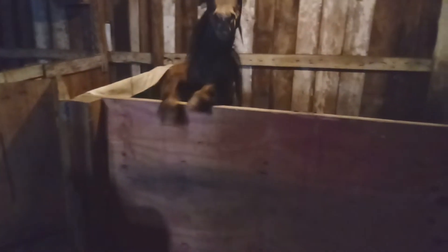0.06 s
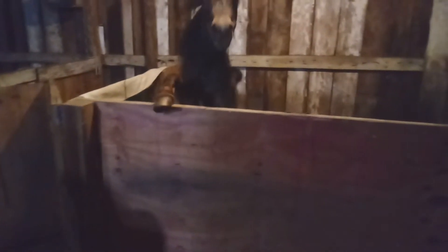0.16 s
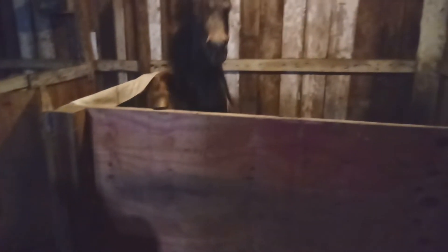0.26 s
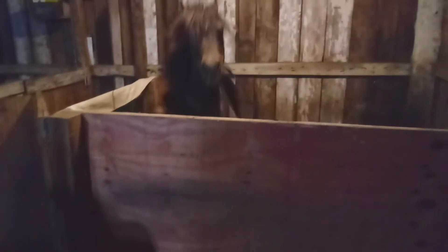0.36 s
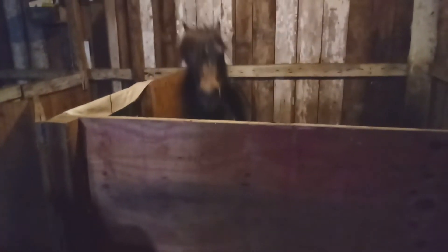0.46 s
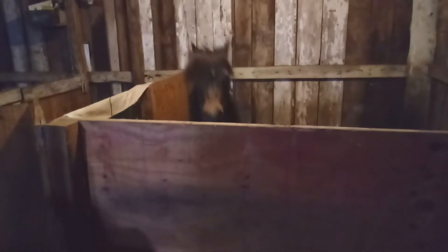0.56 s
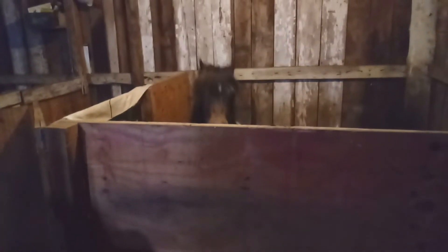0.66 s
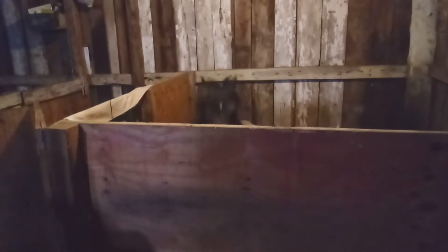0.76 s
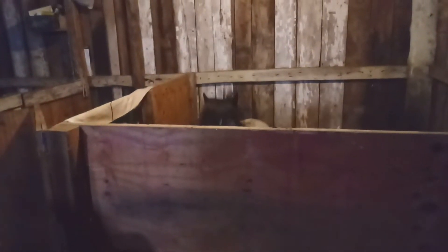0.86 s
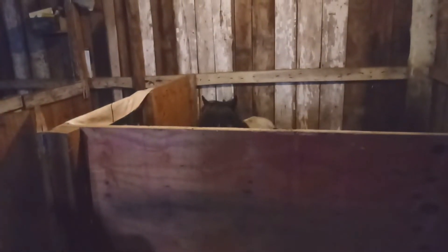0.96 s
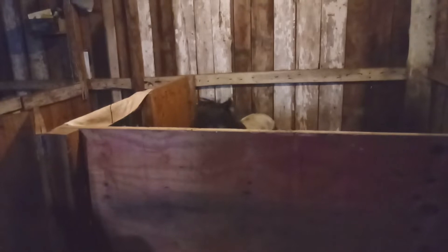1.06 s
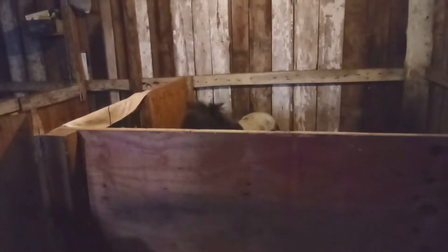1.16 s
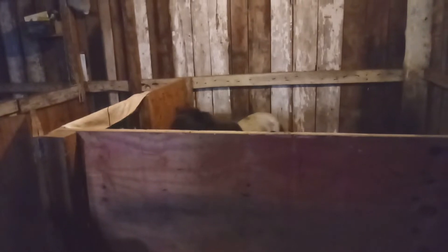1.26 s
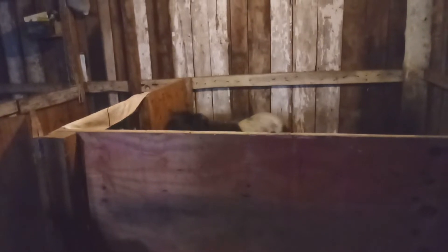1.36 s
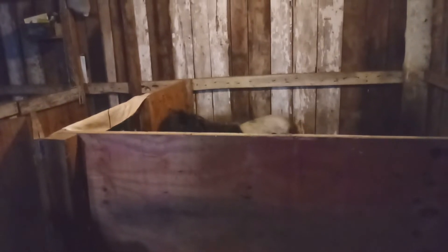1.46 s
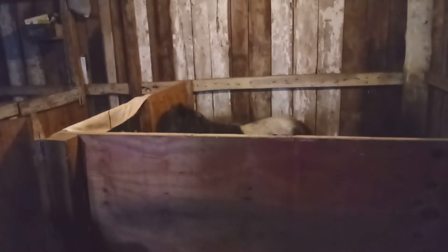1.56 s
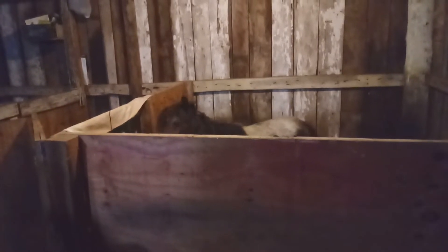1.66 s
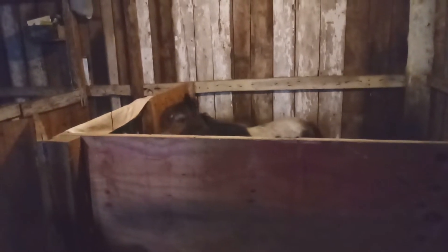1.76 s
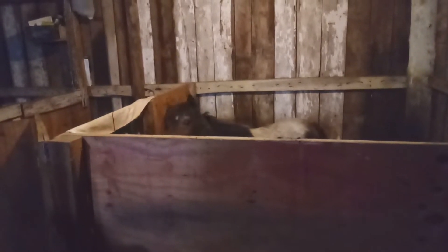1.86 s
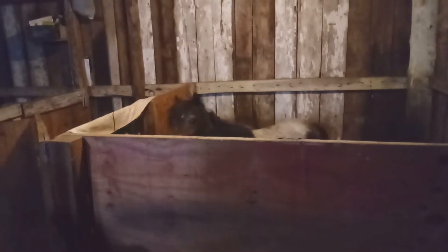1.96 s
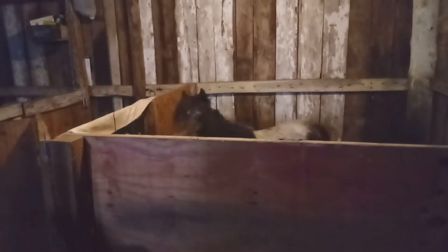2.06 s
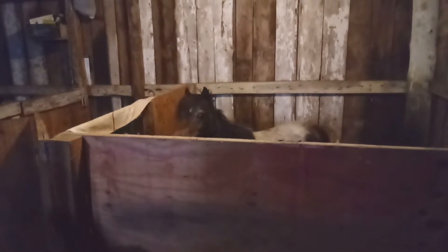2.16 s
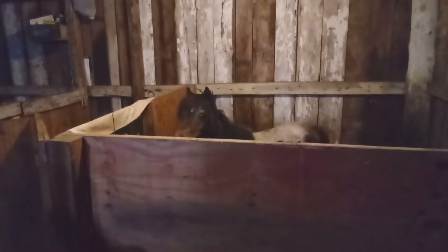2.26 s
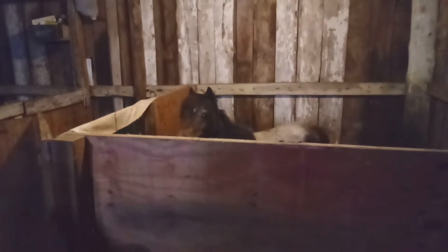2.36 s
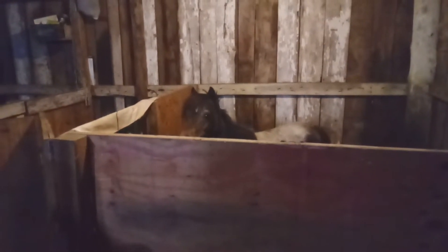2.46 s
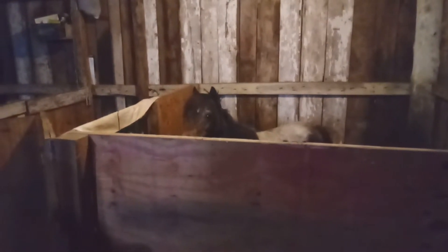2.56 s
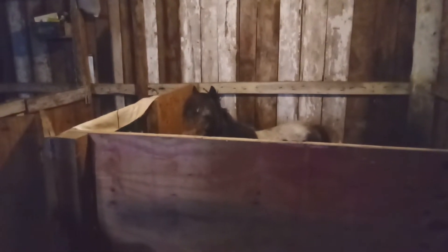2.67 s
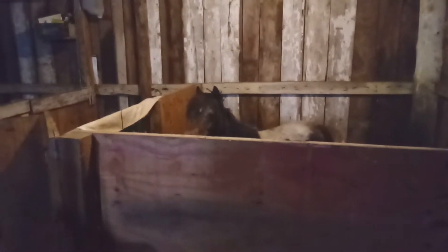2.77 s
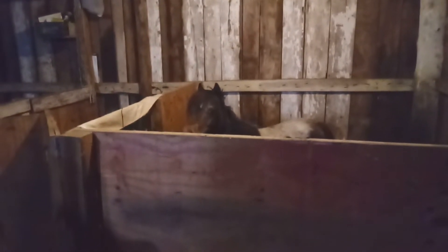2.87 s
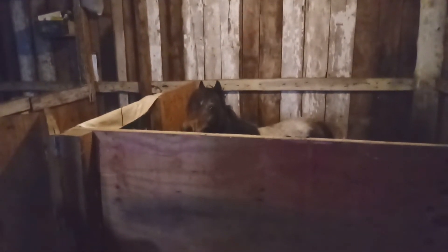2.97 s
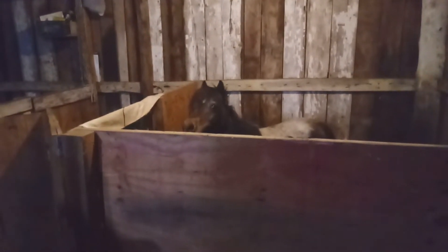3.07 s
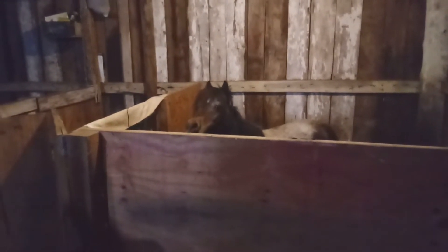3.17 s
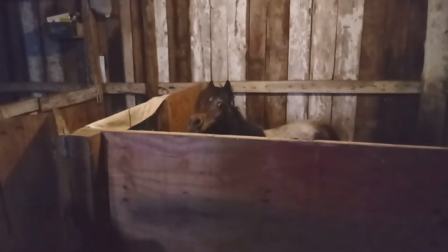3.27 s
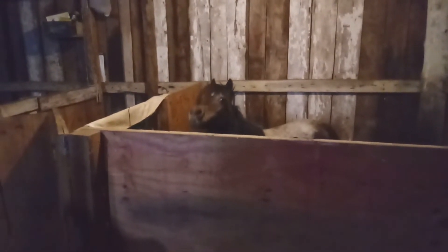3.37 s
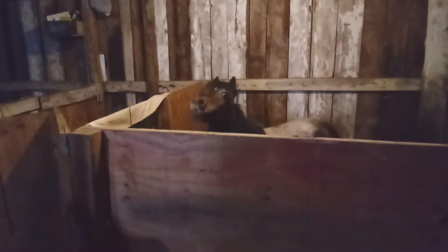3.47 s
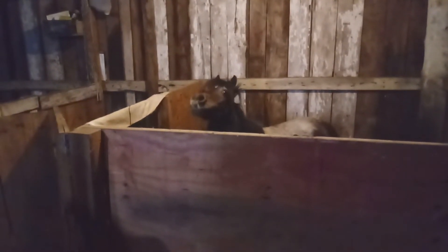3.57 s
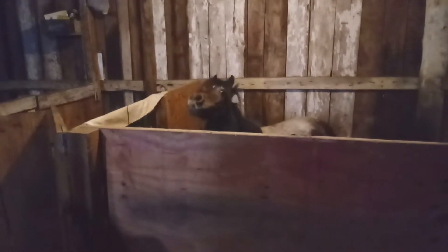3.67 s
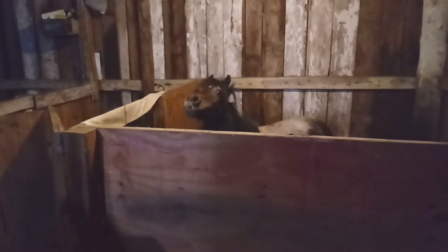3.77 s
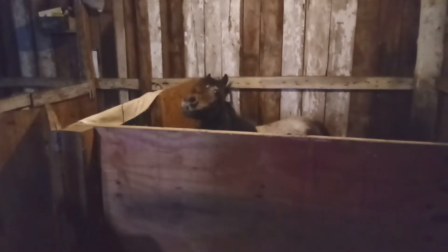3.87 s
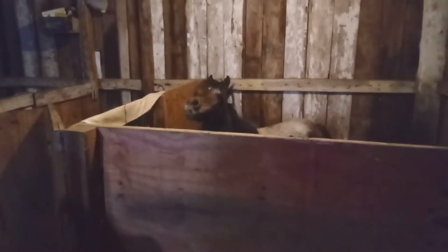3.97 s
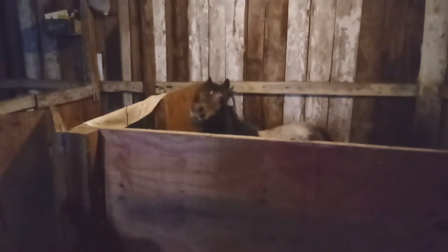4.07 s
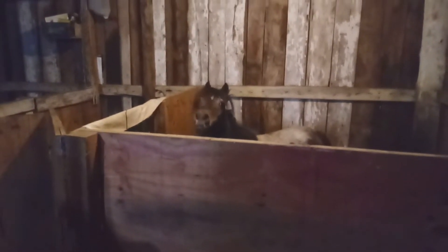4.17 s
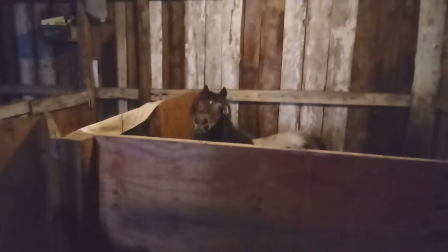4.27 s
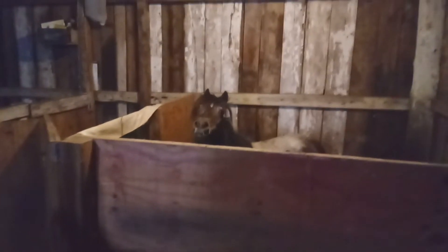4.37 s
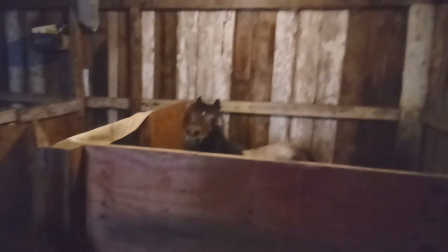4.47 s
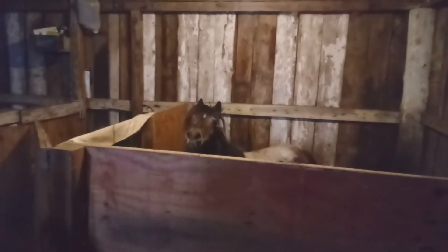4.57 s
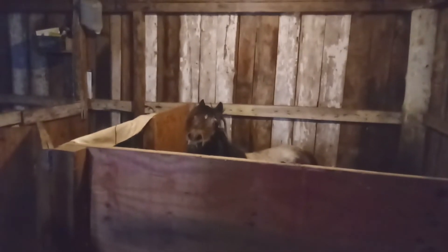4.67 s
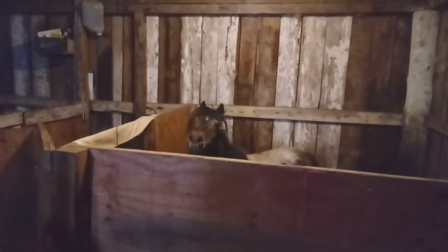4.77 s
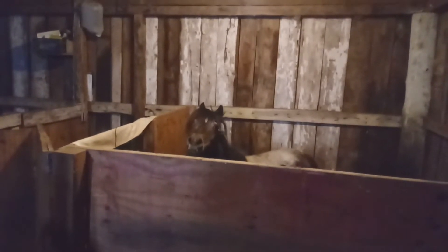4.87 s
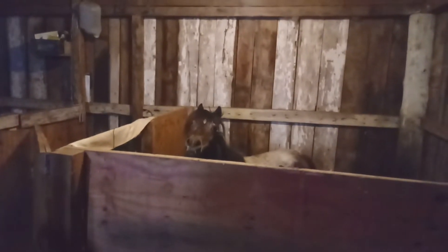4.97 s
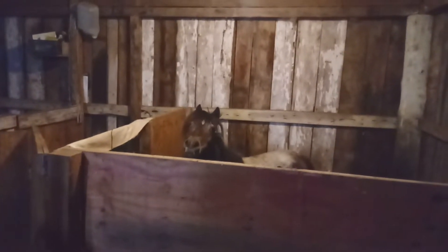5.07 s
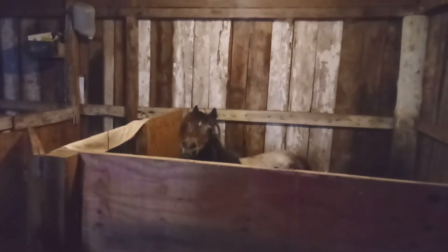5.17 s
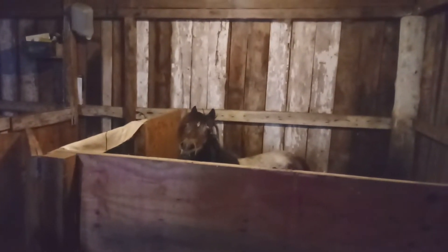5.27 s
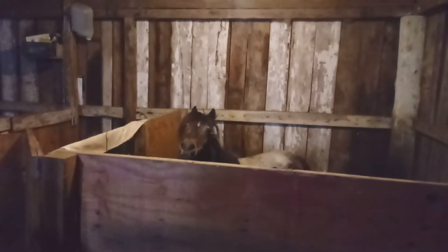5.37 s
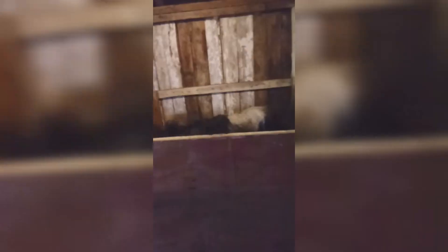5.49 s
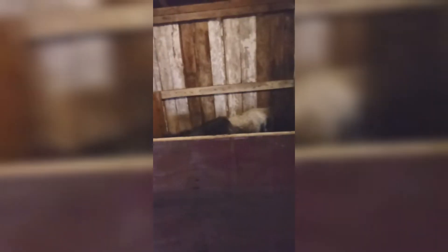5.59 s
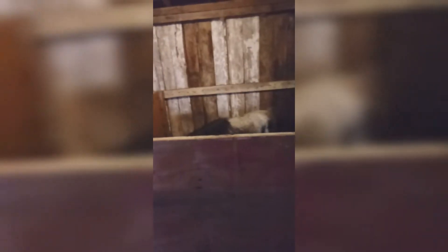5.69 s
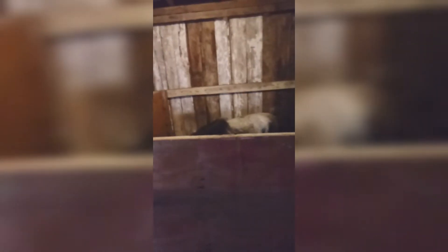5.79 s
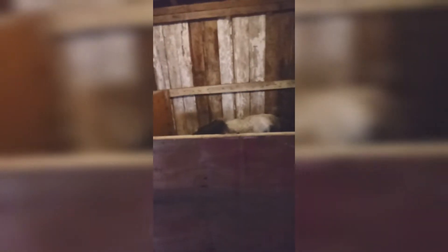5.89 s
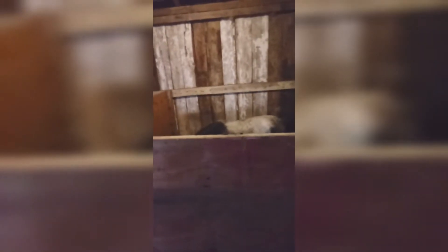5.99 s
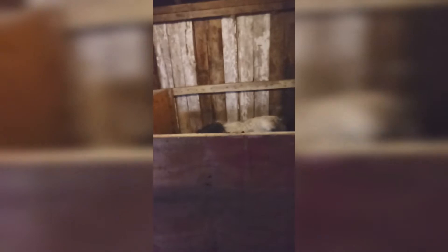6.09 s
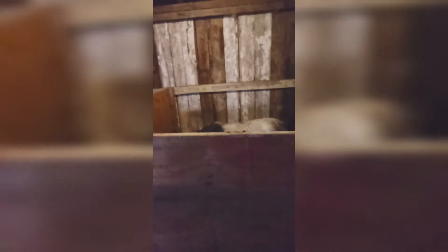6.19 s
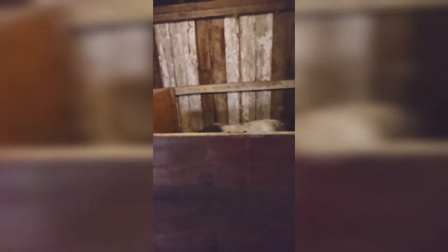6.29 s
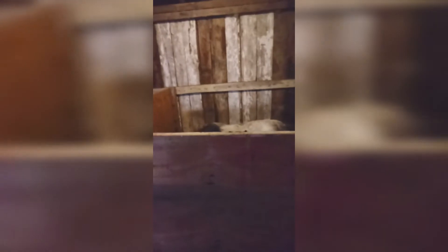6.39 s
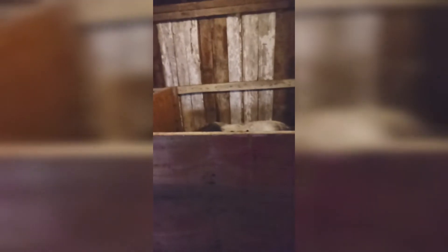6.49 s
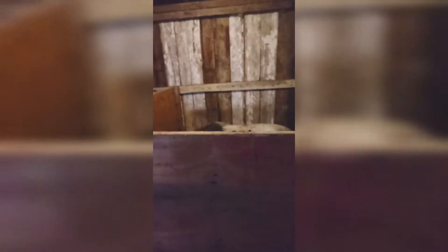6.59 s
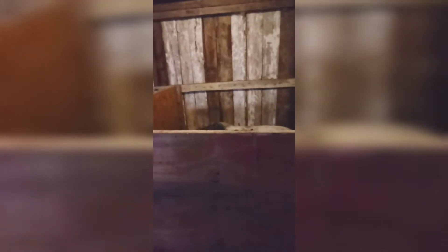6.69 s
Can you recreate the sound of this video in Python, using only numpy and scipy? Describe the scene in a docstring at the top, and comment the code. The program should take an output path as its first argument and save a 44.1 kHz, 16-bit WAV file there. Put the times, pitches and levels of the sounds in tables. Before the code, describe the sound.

Booming hoof knocks, a board groan and straw steps give way to shrill crickets; a tiny dropout, then a falling pony squeal and fluttering snort.

```python
"""Pony in a wooden barn at night

A dense chorus of crickets, made of stroke trains and noise through wing resonances, rasps over a faint night bed.
A pony drags its front hooves off the stall boards, lands and steps about in the straw: contact bursts ring
panel, planks and hoof. After a soft bump and a short cut in the sound the chorus fades in again, quieter. The pony
gives a hoarse, falling squeal and a low fluttering snort: rough pulse trains and hiss through airway resonances."""
import sys
import numpy as np
from scipy import signal
from scipy.fft import rfft, irfft
from scipy.io import wavfile
from scipy.ndimage import uniform_filter1d, map_coordinates

SR = 44100
rng = np.random.default_rng(int(sys.argv[2]) if len(sys.argv) > 2 else 0)


def dump_mix(stems):
    """Bounce the given channels to the path in sys.argv[1] as a 16-bit WAV at rate SR."""
    frames = np.atleast_2d(stems).T  # one column per channel
    limited = np.clip(frames, -1, 1)  # hard clip at full scale
    pcm = np.round(limited * 32767).astype(np.int16)
    wavfile.write(sys.argv[1], SR, pcm)


N = 297234
T = np.arange(N) / SR
DROPOUT_START_S, DROPOUT_END_S = 5.423, 5.465

# resonances of the stall panel: (frequency [Hz], width [Hz], relative level [dB])
PANEL = [(68.7, 29.6, -1), (97.4, 46, -3.5), (132.4, 17.3, 3.5), (174, 51, -6.5), (199.4, 13, -5),
         (248, 21, -7.5), (309, 27, -14)]


def amp(db):
    """Decibels to gain."""
    return 10 ** (np.asarray(db) / 20)


def rms_one(x):
    """Scale to unit power."""
    return x / np.sqrt(np.mean(x ** 2) + 1e-20)


def in_time(rows):
    """Each column of a curve after its time column, sample by sample."""
    s, *columns = np.transpose(rows)
    return [np.interp(T, s, c) for c in columns]


def at_hz(points, hz):
    """Read a table on a log-frequency axis."""
    f, value = np.transpose(points)
    return np.interp(np.log(np.maximum(hz, 1)), np.log(f), value)


def drift(rate):
    """Random wander of unit power, gliding in straight lines to a new value rate times a second."""
    knots = rng.standard_normal(8192)
    return rms_one(np.interp(T * rate, np.arange(len(knots)), knots))


def colour(x, spectrum):
    """Causal (minimum-phase) filter with the given spectrum, built by folding its cepstrum."""
    size = 8192
    log_gain = np.log(amp(at_hz(spectrum, np.fft.rfftfreq(size, 1 / SR))))
    cepstrum = irfft(log_gain)
    cepstrum[1:size // 2] *= 2
    cepstrum[size // 2 + 1:] = 0
    return signal.fftconvolve(x, irfft(np.exp(rfft(cepstrum))))[:N]


def resonate(x, modes, order=1):
    """Parallel resonances; order 2 passes each section twice for steeper skirts."""
    out = 0
    for k, (hz, width, db) in enumerate(modes):
        r = np.exp(-np.pi * width / SR)
        section = [(1 - r * r) / 2, 0, (r * r - 1) / 2, 1, -2 * r * np.cos(2 * np.pi * hz / SR), r * r]
        sign = (-1) ** (k * order)
        # the tiny offset keeps the filter state out of denormal numbers
        out = out + sign * amp(db) * signal.sosfilt([section] * order, x + 1e-18)
    return out


def pulses(rate, rough):
    """One sharp pulse a cycle, mixed with a puff of noise in each cycle; about unit power."""
    cycles = np.cumsum(rate) / SR
    samples_off = (cycles % 1 - .5) * SR / rate
    sharp = np.sinc(samples_off / 2) * np.exp(-(samples_off / 10) ** 2) * np.sqrt(SR / rate) / 2
    puffs = rms_one(rng.standard_normal(N) * np.sin(np.pi * cycles) ** 4)
    rough = np.clip(rough, 0, 1)
    return np.sqrt(1 - rough) * sharp + np.sqrt(rough) * puffs


def barn(x, wet_db):
    """Direct sound plus dense reflections off the boards, the treble dying first; echo of unit energy."""
    # decay time of the barn: (frequency [Hz], time to fall 60 dB [s])
    decay_times = [(100, 0.47), (400, 0.43), (1500, 0.45), (5000, 0.3), (14000, 0.18)]
    t, tail = T[:SR], 0
    edges = np.geomspace(40, 18000, 10)
    for low, high in zip(edges, edges[1:]):
        bandpass = signal.butter(2, [low, high], "band", fs=SR, output="sos")
        band = signal.sosfilt(bandpass, rng.standard_normal(SR))
        t60 = at_hz(decay_times, np.sqrt(low * high))
        tail = tail + band * np.exp(-np.log(1000) * t / t60) / np.sqrt(t60)
    echo = amp(wet_db) * tail / np.linalg.norm(tail)
    echo[0] += 1   # direct sound
    return signal.oaconvolve(x, echo / np.linalg.norm(echo))[:N]


def envelope(start_s, attack_s, hold_s, release_db_per_s):
    """A straight rise, a hold and an exponential release, as a gain."""
    rise = np.clip((T - start_s) / attack_s, 0, 1)
    return rise * amp(-release_db_per_s * np.maximum(T - start_s - attack_s - hold_s, 0))


def swells(rows):
    """Brief bell-shaped swells (time [s], level [dB], width [s]), as a gain."""
    return sum(amp(db) * np.exp(-((T - s) / width) ** 2) for s, db, width in rows)


def microphone_hiss():
    """Steady coloured noise of the microphone."""
    # spectrum: (frequency [Hz], relative level [dB])
    hiss_colour = [(3000, -4.5), (10500, 1), (12500, -17.5), (15500, -4.5)]
    return amp(-66) * rms_one(colour(rng.standard_normal(N), hiss_colour))


def far_night():
    """Far background: coloured noise whose level wavers a little, spread by the barn."""
    # spectrum: (frequency [Hz], relative density [dB per Hz])
    night_colour = [(24, -37), (40, -8), (125, -2), (248, -12.5), (331, -8.5), (376, -14), (426, -8),
                    (520, -17), (878, -10.5), (979, -15.5), (2210, -10.5), (2460, -5), (3000, -20),
                    (3900, -36), (6600, -120)]
    noise = rms_one(colour(rng.standard_normal(N), night_colour))
    return barn(amp(-55 + 1.7 * drift(7.9)) * noise, wet_db=-0.5)


def crickets(wander=.0025, jitter=.005, crowd_db=-3.0):
    """Near insects drive their wing resonance with rapid strokes; far ones of each kind merge into a hiss."""
    # slow swell of the chorus, ahead of the fade below: (time [s], level [dB])
    chorus_swell = [(0, -27.5), (.8, -25.5), (1.3, -27), (2.9, -26), (5.4, -27)]
    # kinds: (wing strokes [per s], wing pitch [Hz], width of one filter pass [Hz], relative level [dB],
    # scratchiness [0-1])
    kinds = [(125, 5753, 880, -4, 0.01), (165.2, 6230, 680, -10, 0), (172.6, 5316, 610, -6, 0.07),
             (113.9, 4846, 770, -10.5, 0.4), (146.5, 3570, 485, -14, 0.94)]
    # colour of the whole chorus: (frequency [Hz], gain [dB])
    chorus_colour = [(2400, -3.5), (2900, -6), (3550, -0.5), (4120, -8), (4800, 1), (6650, 2), (6900, -7.5),
                     (7400, -9.5), (8000, -24.5), (10000, -15), (13000, -9)]
    after_db, fade_in_s = -7.5, 0.54   # from the cut in the sound on: a fade-in to a lower level

    chorus = 0
    for rate, hz, width, db, scratch in kinds:
        unsteady_rate = rate * (1 + wander * drift(1.2) + jitter * drift(90))
        near = rms_one(barn(pulses(unsteady_rate, scratch), wet_db=4.5))
        singers = near + amp(crowd_db) * rng.standard_normal(N)
        chorus = chorus + amp(db) * rms_one(resonate(singers, [(hz, width, 0)], order=2))
    fade_in = amp(after_db) * np.clip((T - DROPOUT_START_S) / fade_in_s, 0, 1)
    presence = np.where(T < DROPOUT_START_S, 1, fade_in)
    return amp(in_time(chorus_swell)[0]) * presence * colour(chorus, chorus_colour)


def bump(at_s=5.4, hz=113, level_db=-27, width_s=0.0028):
    """A soft, dull bump on the microphone: a sine under a short bell."""
    t = T - at_s
    return amp(level_db) * np.exp(-(t / width_s) ** 2) * np.sin(2 * np.pi * hz * t)


def contacts(rows, grit, swell=1):
    """Each contact (time [s], level [dB], decay constant [s]) is a push, then a crunch that swells and dies."""
    out, t = np.zeros(N + SR), T[:SR // 2]
    for s, db, length in rows:
        crunch = rng.standard_normal(len(t)) * (t / length) ** abs(swell) * np.exp(-t / length)
        burst = grit * crunch / np.linalg.norm(crunch)
        burst[0] += 1   # the push
        at = max(round(s * SR), 0)
        out[at:at + len(t)] += amp(db) * burst / np.linalg.norm(burst)
    return out[:N]


def struck(force, body, table):
    """Pass contacts through a body, so that 0 dB is unit power over a twentieth of a second."""
    impulse_energy_root = np.linalg.norm(body(signal.unit_impulse(N), table))
    return body(force, table) * np.sqrt(SR / 20) / impulse_energy_root


def wood(force, modes, soft_hz=1100):
    """Soft timber takes the edge off the force before it rings."""
    lowpass = signal.butter(2, soft_hz, fs=SR, output="sos")
    return resonate(signal.sosfilt(lowpass, force + 1e-18), modes)


def blows(s, boom_db, knock_db, clop_db, crack_db):
    """Blows shake the whole panel, ring planks and hoof, and crack at the contact."""
    # planks, then the hollow hoof: (frequency [Hz], width [Hz], relative level [dB])
    planks = [(221.5, 60, -3), (330, 83, -1), (427, 37, -1), (498, 114, -9), (630, 69, -26.5)]
    hollow_hoof = [(653, 117, 2.5), (870, 177, 0), (1156, 220, -6.5)]
    # crack at the contact: (frequency [Hz], relative level [dB])
    crack_colour = [(400, -26), (900, 7.5), (1500, 6.5), (2400, 4), (4000, 1), (6500, 0.5), (9000, -25.5),
                    (15000, -73)]
    boom_s, knock_s, clop_s, crack_s = 0.045, 0.0097, 0.0087, 0.0082   # decay constants of the forces

    boom = struck(contacts(np.broadcast(s, boom_db, boom_s), grit=0.73, swell=0), wood, PANEL)
    knock = struck(contacts(np.broadcast(s, knock_db, knock_s), grit=0.88, swell=0), wood, planks)
    clop = struck(contacts(np.broadcast(s, clop_db, clop_s), grit=0.99, swell=0), wood, hollow_hoof)
    crack = struck(contacts(np.broadcast(s, crack_db, crack_s), grit=8.1, swell=0.29), colour, crack_colour)
    return barn(boom, wet_db=3.5) + barn(knock + clop + crack, wet_db=9.5)


def steps():
    """The pony lands and steps about; a harder contact clops and cracks more, and straw crunches underfoot."""
    # footfalls: (time [s], knock level [dB], contact hardness [dB], crushed straw level [dB])
    footfalls = [(.427, -16.5, -3, -42), (.535, -11.5, -7.5, -31), (0.548, -19.5, 12, -49),
                 (.566, -18, 2, -55), (.607, -19.5, -15, -60), (.656, -29, 1, -32.5), (.741, -37, 8.5, -49),
                 (.866, -27, 2.5, -37), (.968, -26.5, -5, -28.5), (1.074, -36, 5.5, -44),
                 (1.203, -43.5, -8, -73), (1.407, -63, 11, -50.5), (1.477, -40.5, 0, -70),
                 (3.614, -61.5, 11, -73), (3.759, -60, 0, -79)]
    # straw: (frequency [Hz], relative level [dB])
    straw_colour = [(800, 10.5), (3000, -4.5), (7000, 9.5), (10000, -7.5), (13000, -15), (15500, -5)]
    boom_growth = 0.12     # extra boom per dB of weight: light steps hardly shake the panel
    clop_follows = 0.57    # share of the hardness that goes into the clop
    crunch_s = 0.014       # decay constant of one crunch

    s, db, hard, straw_db = np.transpose(footfalls)
    crunches = contacts(np.broadcast(s, straw_db, crunch_s), grit=60, swell=0.62)
    straw = struck(crunches, colour, straw_colour)
    boom_db = db - 2 + boom_growth * db
    clop_db = db - 5.5 + clop_follows * hard
    crack_db = db - 7 + hard
    return blows(s, boom_db, db, clop_db, crack_db) + barn(straw, wet_db=3.0)


def drag():
    """The front hooves catch, slip and scrape off the top board; each slip makes the panel boom."""
    # catches and slips: (time [s], boom level [dB])
    slips = [(.002, -19.5), (.066, -11.5), (.145, -11.5), (.172, -9.5), (0.219, -14), (.275, -9),
             (.303, -12.5), (.331, -11)]
    # scraping over the board edge: (time [s], level [dB], decay constant [s])
    scrapes = [(.002, -26.5, 0.058), (.03, -22.5, 0.083), (.11, -23, 0.1), (.246, -21, 0.0024),
               (.27, -27.5, 0.008)]
    # scrape: (frequency [Hz], relative level [dB])
    scrape_colour = [(1000, -13), (3200, -11), (4600, -0.5), (6300, 1.5), (7600, -11), (9500, -26),
                     (13000, -38.5), (15500, -29)]
    hardens_db_per_s = 27   # the hoof's rim nears the edge: more knock and clop

    s, db = np.transpose(slips)
    hard = db + hardens_db_per_s * s
    scrape = struck(contacts(scrapes, grit=17, swell=.1), colour, scrape_colour)
    hits = blows(s, boom_db=db, knock_db=hard - 17, clop_db=hard - 30, crack_db=db - 22)
    return hits + barn(scrape, wet_db=0.5)


def groan(hz=129.7, waver=0.017, rough=.05):
    """The rubbing hoof makes the board groan: an almost even train of tiny slips, close to a panel resonance."""
    # groans: (time [s], level [dB], width [s])
    groan_swells = [(.02, -19, 0.014), (.175, -16.5, 0.046), (.335, -9, 0.055)]
    rubbing = pulses(hz * (1 + waver * drift(24.5)), rough)
    return swells(groan_swells) * rms_one(barn(wood(rubbing, PANEL), wet_db=-18))


def call(pitch, rough, tightness, airway, gains, jitter, waver, rasp_db, doubling, wobble):
    """Unsteady, rough pulses excite three groups of wobbling resonances, each levelled to its own gain."""
    pitch = pitch * (1 + jitter * drift(300) + waver * drift(40))
    strong_weak = 1 + doubling * np.sin(np.pi * np.cumsum(pitch) / SR)   # alternate pulses: half-pitch lines
    source = pulses(pitch, rough) * strong_weak * amp(rasp_db * drift(130))
    clock = np.cumsum(tightness * (1 + wobble * drift(25)))   # a tighter airway rings on a faster clock
    source = np.interp(np.arange(clock[-1]), clock, source)
    out = 0
    for modes, gain in zip(airway, gains):
        ringing = map_coordinates(resonate(source, modes, order=2), [clock], order=3)
        running_level = np.sqrt(uniform_filter1d(ringing ** 2, size=1800) + 1e-12)
        out = out + gain * ringing / running_level
    return out


def nostril_air(flicker_db=2.7):
    """Turbulent, flickering hiss at the pony's nostrils."""
    # hiss with the nose's dips: (frequency [Hz], relative level [dB])
    air_colour = [(900, -15), (1550, -12.5), (2000, -43), (2600, -1), (3500, 7), (4050, -3), (5000, 10.5),
                  (8000, -5), (10000, -22.5), (13500, -18), (15300, -11)]
    return amp(flicker_db * drift(90)) * rms_one(colour(rng.standard_normal(N), air_colour))


def snort():
    """Flapping nostrils slow down and roughen; rushing air brings in the high resonances of the nose."""
    # nose, low to high, before the tightness: (frequency [Hz], width of one filter pass [Hz], relative level [dB])
    nose_low = [(85.6, 67, 0), (142, 36, 1.5), (205, 55, -4.5), (308, 84, -6)]
    nose_mid = [(555, 110, -5), (883, 98, 2.5), (1150, 75, -3.5), (1474, 160, -9.5)]
    nose_high = [(2427, 65, 1), (2680, 260, 0), (3080, 99, 2), (3760, 450, -9.5), (5100, 790, -21),
                 (6570, 240, -3.5)]
    # a puff in the nose before the snort, a squeak within it: (time [s], level [dB], width [s])
    puff_and_squeak = [(6.195, -35, 0.013), (6.482, -23.5, 0.02)]
    start_s, settle_s = 6.218, .045
    first_hz, settled_hz = 175.1, 73.87   # the nostrils flap fast at first, then settle
    settled_rough = 0.46   # the first flaps are clean
    mid_blown = 0.45       # share of the middle resonances that the rush of air drives

    settled = 1 - np.exp(-(np.maximum(T - start_s, 0) / settle_s) ** 2)
    rate = first_hz + (settled_hz - first_hz) * settled
    flap = envelope(start_s, attack_s=0.018, hold_s=0.26, release_db_per_s=150)
    blow = envelope(6.22, attack_s=0.03, hold_s=0.24, release_db_per_s=140)
    both = flap + mid_blown * (blow - flap)
    gains = amp(-21.5) * flap, amp(-28.5) * both, amp(-32.5) * blow + swells(puff_and_squeak)
    flutter = call(rate, settled_rough * settled, 0.99, (nose_low, nose_mid, nose_high), gains,
                   jitter=.08, waver=.07, rasp_db=3.5, doubling=0.23, wobble=0.024)
    return flutter + amp(-35) * blow * nostril_air()


def squeal():
    """A hoarse, surging squeal; as its pitch collapses it sinks from the shrill resonances into the chest."""
    # the voice sinks, then collapses: (time [s], pitch [Hz], roughness [0-1])
    voice_curve = [(5.46, 630.4, 0.42), (5.66, 570.6, 0.48), (5.75, 525.7, 0.34), (5.86, 479.5, 0.2),
                   (5.91, 401, 0.42), (5.98, 364.7, 0.46), (6.01, 284.5, 0.3), (6.05, 176, 0.26),
                   (6.1, 145.6, .5)]
    # airway at the taut pitch: (frequency [Hz], width of one filter pass [Hz], relative level [dB])
    chest_modes = [(191, 196, -2.5), (314, 124, 2)]
    mouth_modes = [(566, 165, -2), (856, 120, 3), (1096, 130, -3.5), (1440, 58, -3.5), (1630, 55, -8.5)]
    shrill_modes = [(2406, 90, -2), (2630, 230, 1), (3124, 400, 0), (3460, 300, -0.5), (4675, 410, -8),
                    (5590, 180, -1.5), (6350, 460, -6.5)]
    # chest, mouth and shrill groups: (level when taut [dB], change when slack [dB])
    registers = [(-42, 21.5), (-27, 7), (-20.5, -4.5)]
    # the voice breaks into a grunt in the chest: (time [s], level [dB], width [s])
    grunts = [(6.003, -24.5, 0.011), (6.04, -29, 0.019)]
    taut_hz, slack_hz = 520, 280   # pitch of the taut and of the slack voice
    airway_follows = 0.041         # exponent by which the resonances sink with the pitch
    surge_at_s, surge_every_s, surge_db = 5.775, 0.114, 1   # pushed out in even surges

    pitch, rough = in_time(voice_curve)
    surge = amp(surge_db * np.cos(2 * np.pi * (T - surge_at_s) / surge_every_s))
    effort = envelope(5.431, attack_s=0.3, hold_s=0.24, release_db_per_s=212) * surge
    slack = np.minimum((taut_hz - pitch) / (taut_hz - slack_hz), 1)
    chest, mouth, shrill = [effort * amp(db + change_db * slack) for db, change_db in registers]
    gains = chest + swells(grunts), mouth, shrill
    tightness = (pitch / taut_hz) ** airway_follows
    voice = call(pitch, rough, tightness, (chest_modes, mouth_modes, shrill_modes), gains,
                 jitter=.025, waver=.025, rasp_db=3.4, doubling=.55, wobble=.022)
    return voice + amp(-43) * effort * nostril_air()


def scene():
    """Everything reaches one microphone, the same in both channels."""
    surroundings = crickets() + far_night() + microphone_hiss()
    pony = drag() + groan() + steps() + barn(squeal() + snort(), wet_db=-1.0)
    return np.tile(surroundings + pony + bump(), (2, 1))


def gain_control(x, threshold_db=-19, slope=0.49, release_db=45):
    """Loud sound turns the gain down at once; the held excess level then falls by release_db a second."""
    level = 10 * np.log10(np.maximum(uniform_filter1d(x[0] ** 2, size=700), 1e-12))
    excess = np.maximum(level - threshold_db, 0)
    held = np.maximum.accumulate(excess + release_db * T) - release_db * T
    return x * amp(-slope * uniform_filter1d(held, size=200))


def record(dry, bass_cut_hz=40, cutoff_hz=15750):
    """A thin-bassed microphone, gain control, a brief dropout, and the top cut off."""
    highpass = signal.butter(1, bass_cut_hz, "high", fs=SR, output="sos")
    heard = signal.sosfilt(highpass, dry)
    outside_s = np.maximum(DROPOUT_START_S - T, T - DROPOUT_END_S)
    live = np.clip(outside_s / .002, 0, 1)   # 2 ms fades on either side
    lowpass = signal.ellip(10, .1, 80, cutoff_hz, fs=SR, output="sos")
    return signal.sosfilt(lowpass, gain_control(heard) * live)


dry = scene()
out = record(dry)
dump_mix(out)
```